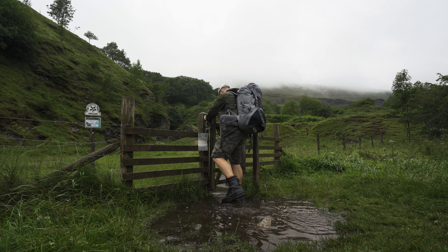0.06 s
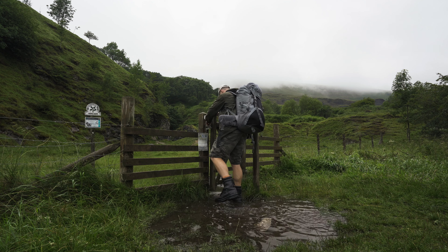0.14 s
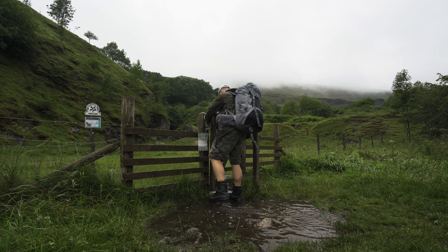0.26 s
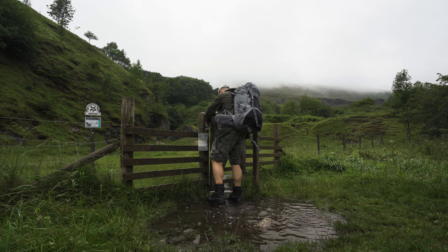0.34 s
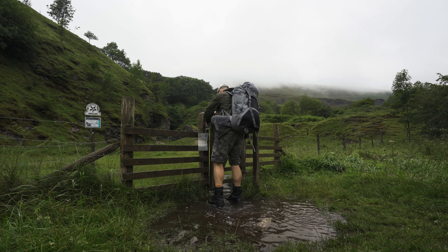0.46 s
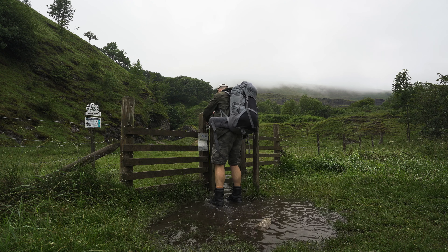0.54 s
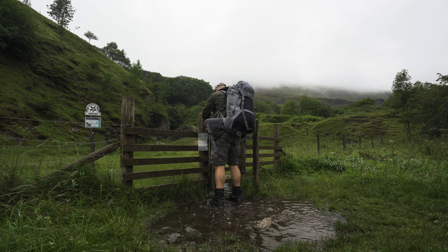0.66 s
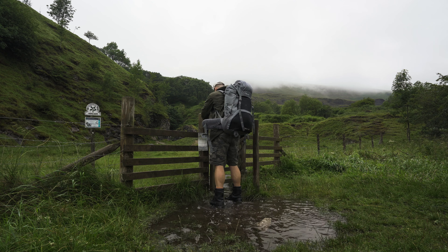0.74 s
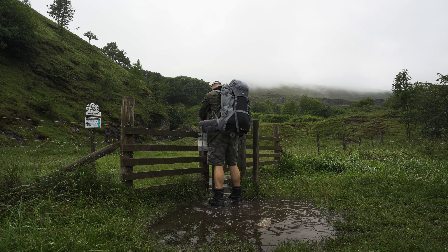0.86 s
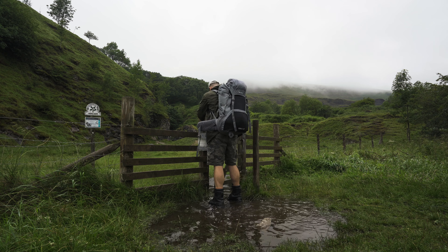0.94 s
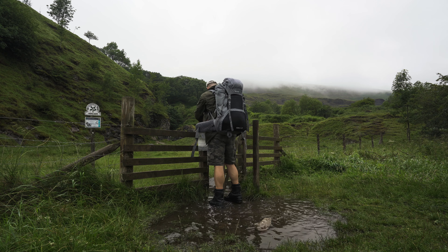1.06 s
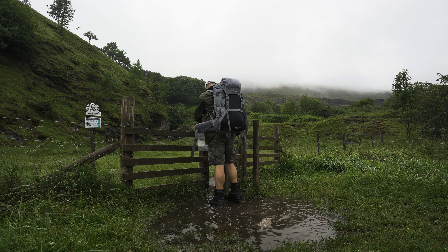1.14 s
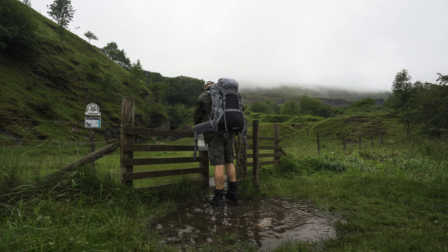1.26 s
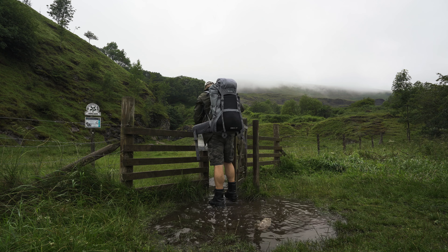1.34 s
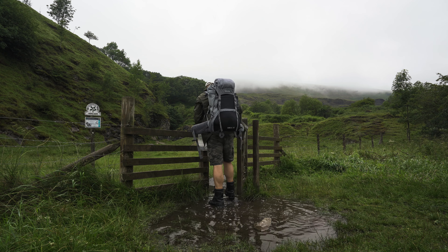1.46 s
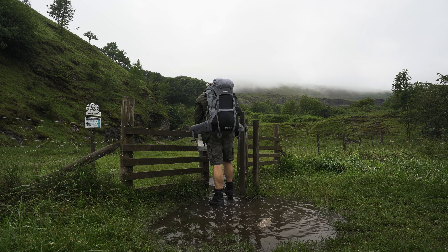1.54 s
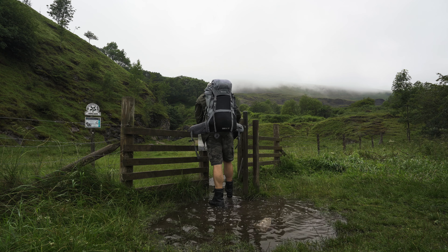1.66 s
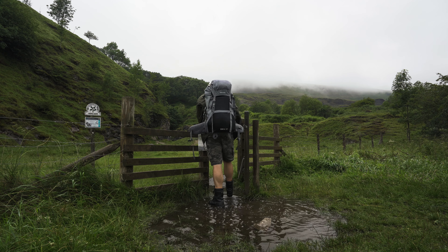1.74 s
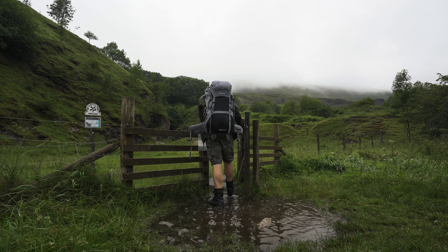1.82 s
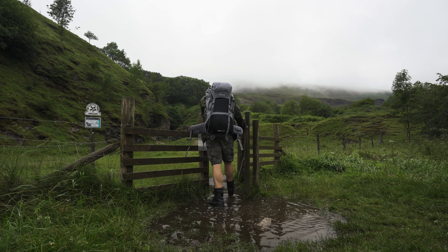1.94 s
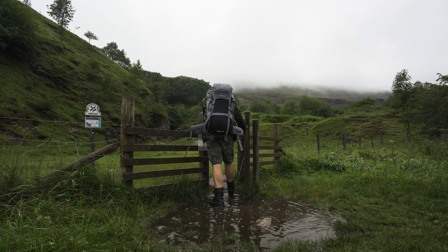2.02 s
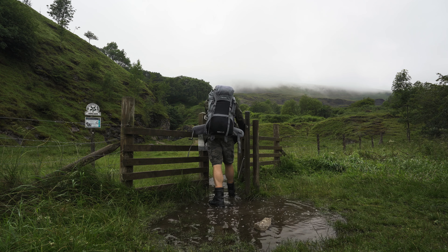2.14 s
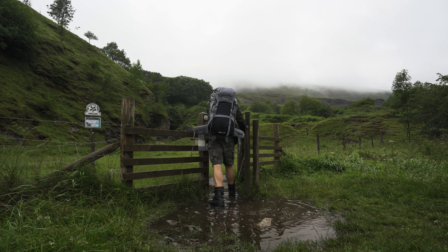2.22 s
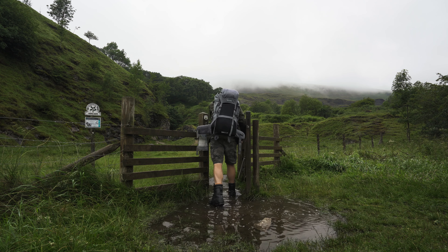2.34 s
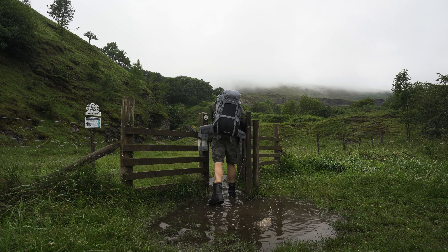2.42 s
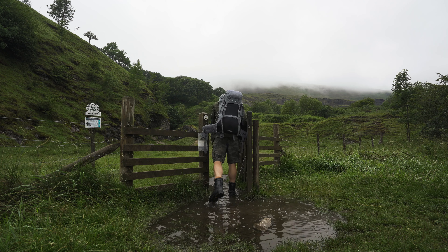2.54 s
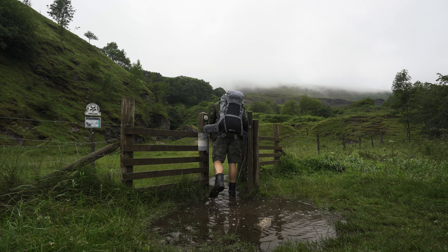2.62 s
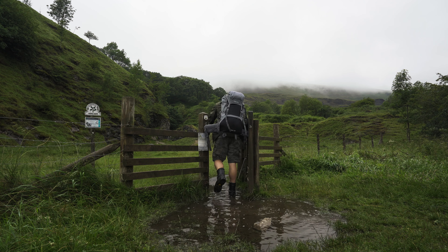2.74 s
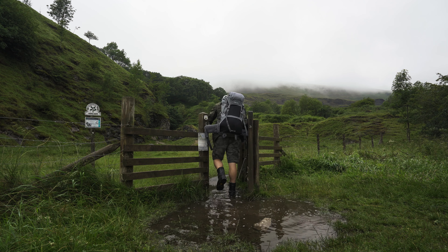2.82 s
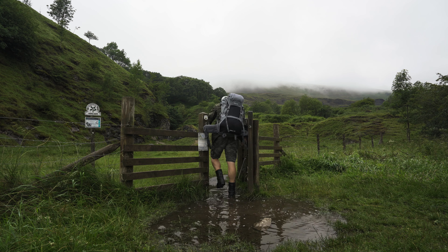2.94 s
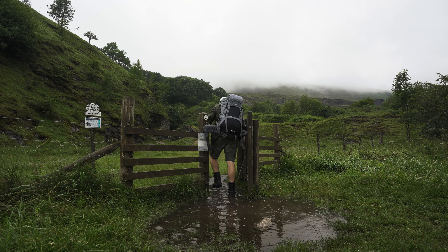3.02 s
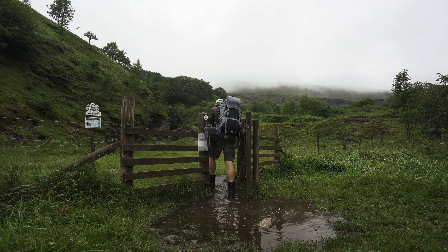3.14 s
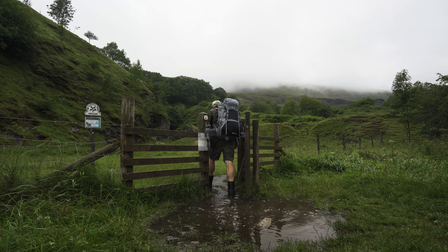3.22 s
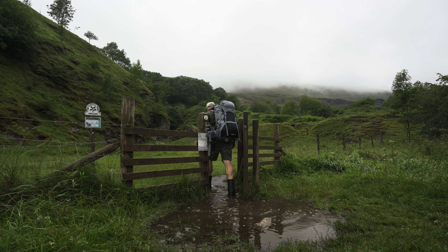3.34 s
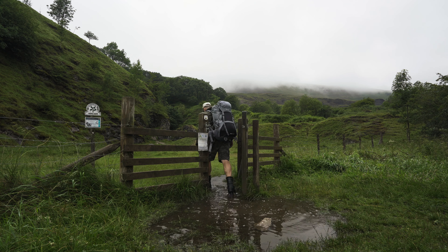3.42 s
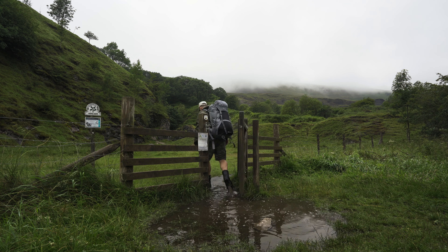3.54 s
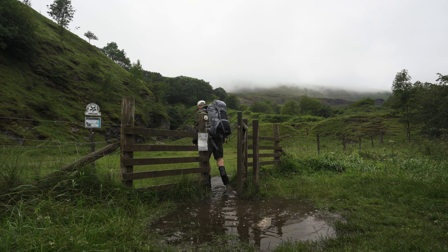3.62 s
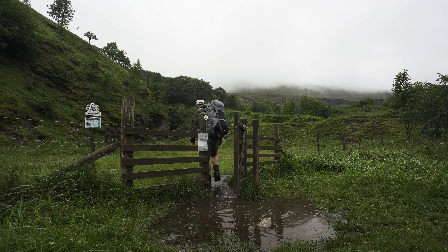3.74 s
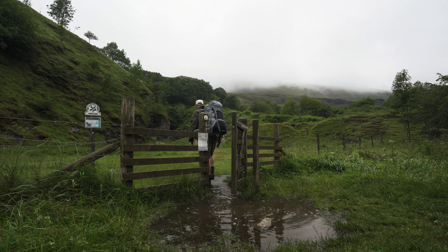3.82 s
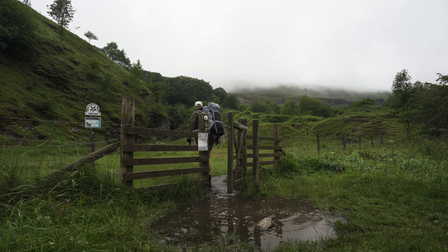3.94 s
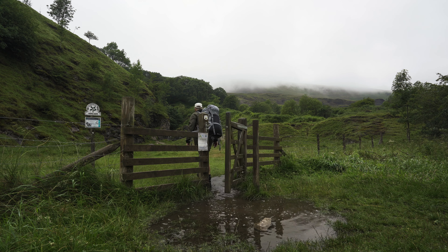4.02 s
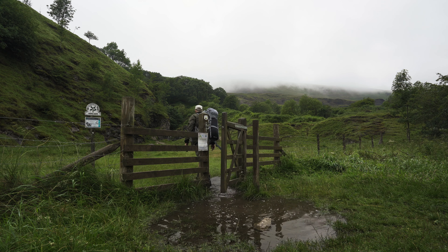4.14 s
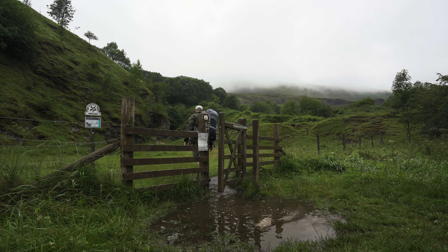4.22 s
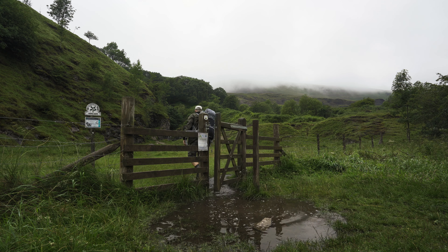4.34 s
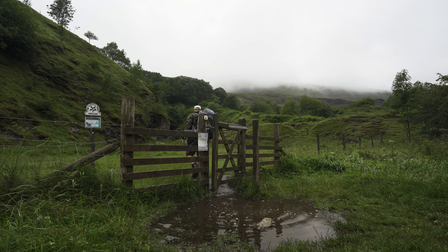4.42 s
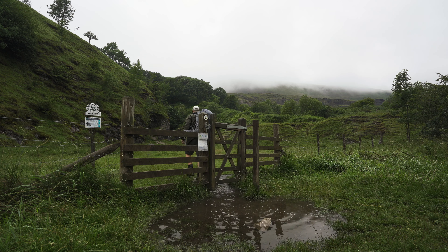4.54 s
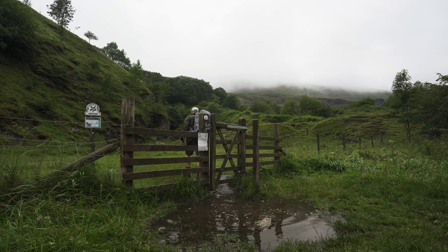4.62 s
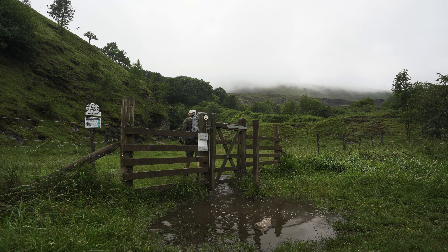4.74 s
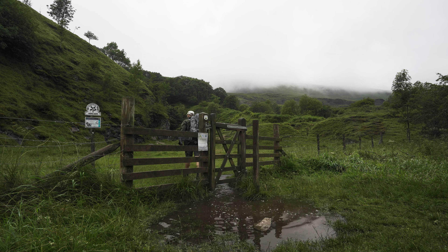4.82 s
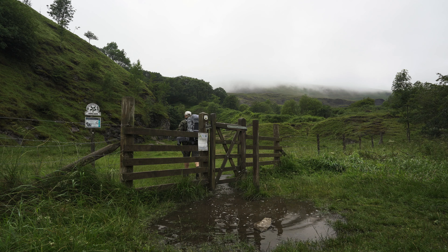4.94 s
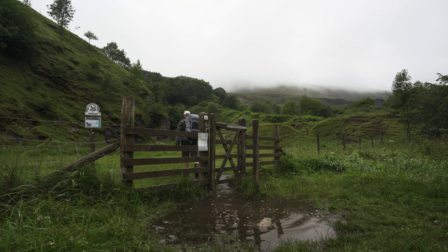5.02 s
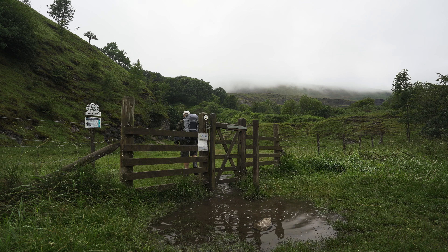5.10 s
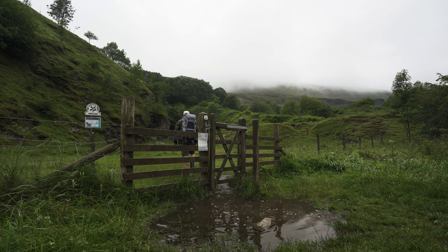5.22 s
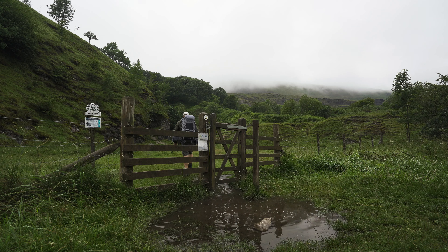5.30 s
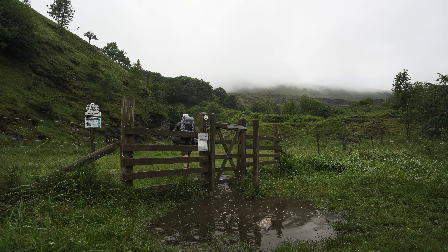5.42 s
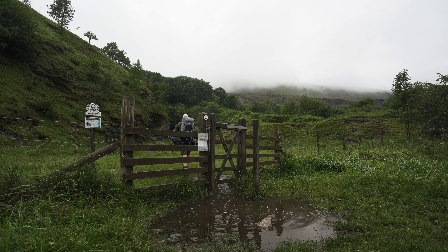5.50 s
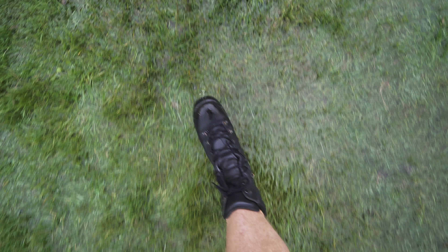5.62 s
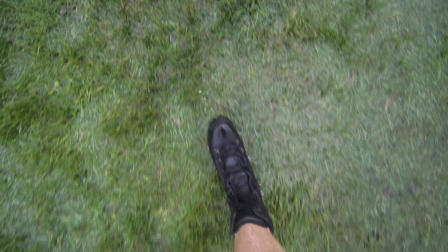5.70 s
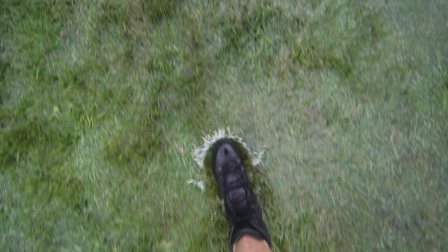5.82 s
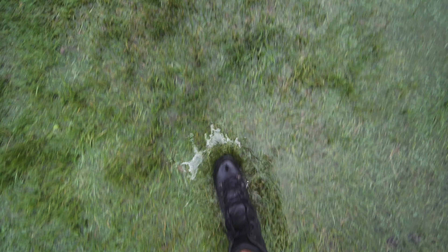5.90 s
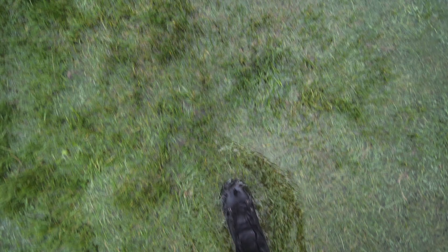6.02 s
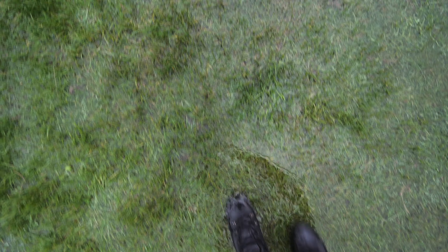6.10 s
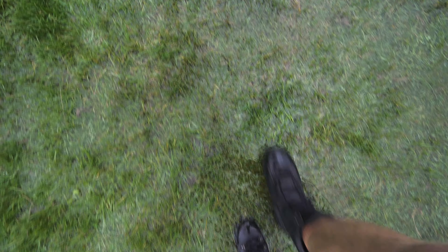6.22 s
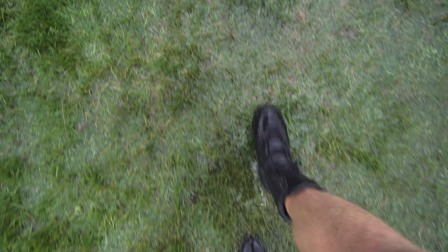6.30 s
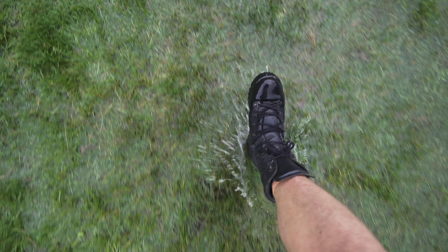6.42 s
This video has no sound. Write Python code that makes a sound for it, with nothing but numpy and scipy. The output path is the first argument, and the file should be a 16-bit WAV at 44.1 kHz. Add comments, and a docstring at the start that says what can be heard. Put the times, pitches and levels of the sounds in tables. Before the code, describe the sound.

A wooden gate clatters open, boots slosh through a puddle, the gate slams and rattles shut, then two close squelching steps.

```python
"""Water stirs and bubbles round a hiker's boots in a puddle, over a faint hiss of drizzle.
A wooden field gate is unlatched, each impact exciting the modes of its rails and steel latch.
The boots wade through, flinging drops and trapping air that resonates as bubbles; small birds call.
The gate slams and rattles shut. Then, heard from close above, two steps squelch into sodden grass
while wind rumbles at the microphone."""
import sys
import numpy as np
from scipy import signal
from scipy.fft import rfft, irfft
from scipy.io import wavfile
from scipy.ndimage import uniform_filter1d

SR = 44100
rng = np.random.default_rng(int(sys.argv[2]) if len(sys.argv) > 2 else 0)


def transcribe(signal):
    """Save signal, clipped to [-1, 1], as a 16-bit WAV file at the path in sys.argv[1]."""
    frames = np.atleast_2d(signal).T
    limited = np.clip(frames, -1, 1)
    pcm = np.round(limited * 32767).astype(np.int16)
    wavfile.write(sys.argv[1], SR, pcm)


N = 284884
TIME = np.arange(N) / SR
RING_TIME = TIME[:SR]  # the second that follows an impact


def undb(db):
    """Decibels to amplitude ratio."""
    return 10 ** (np.asarray(db) / 20)


def unit(x):
    """Normalisation to rms 1."""
    return x / np.sqrt(np.mean(x ** 2))


def burst(x, span=0.0042):
    """Normalisation of a transient to the energy of rms 1 held for span seconds."""
    return x / np.sqrt(np.sum(x ** 2) / (span * SR))


def fade(t60):
    """Exponential free decay, 60 dB in t60 seconds."""
    return np.exp(-np.log(1000) * RING_TIME / t60)


def add(out, s, x):
    """Superposition of x on out, starting at time s."""
    i = int(np.clip(s * SR, 0, N - 1))
    out[i:i + len(x)] += x[:N - i]


def colour(x, spectrum, size=1024):
    """Minimum-phase filter through (frequency [Hz], gain [dB]) points, by folding the cepstrum."""
    hz, db = np.transpose(spectrum)
    bins = np.maximum(np.arange(size // 2 + 1) * SR / size, 1)
    gain = undb(np.interp(np.log(bins), np.log(hz), db))
    cepstrum = irfft(np.log(gain))
    cepstrum[1:size // 2] *= 2
    cepstrum[size // 2 + 1:] = 0
    return signal.fftconvolve(x, irfft(np.exp(rfft(cepstrum))))[:len(x)]


def soften(x, hz, order=2):
    """Low-pass filter with its cutoff at hz."""
    return signal.lfilter(*signal.butter(order, min(hz, SR / 2 - 1), fs=SR), x)


def wander(rate):
    """Smooth random modulation of rms 1, with rate new values a second."""
    hold = int(SR / rate)
    steps = np.repeat(rng.standard_normal(N // hold + 1), hold)[:N]
    return unit(uniform_filter1d(steps, hold))


def patter(rate, spread_db):
    """Shot noise: on average rate impulses a second, of very uneven size."""
    sizes = undb(spread_db * np.minimum(rng.exponential(size=N), 3.5))
    return unit((rng.random(N) < rate / SR) * rng.choice([-1, 1], N) * sizes)


def chirps(table, attack, waver_oct):
    """Frequency modulation: gliding, unsteady sines that swell and die away."""
    out, wobble = np.zeros(N), wander(500)
    for s, hz, db, length, octaves in table:
        age = np.linspace(0, 1, int(length * SR))
        shape = age ** attack * (1 - age) ** 2
        drift = waver_oct * wobble.take(int(s * SR) + np.arange(len(age)), mode="wrap")
        pitch = hz * 2 ** (octaves * age + drift)
        add(out, s, undb(db) * shape / shape.max() * np.sin(2 * np.pi * np.cumsum(pitch) / SR))
    return out


# spectrum of drizzle on the field: (frequency [Hz], relative level [dB])
DRIZZLE_SPECTRUM = [(15, -31), (28, -7.5), (42, 3.5), (70, -5), (130, -4.5), (166, -6), (212, -4),
                    (427, -9.5), (677, -12), (1260, -14), (1610, -26), (2480, -20), (8360, -31.5),
                    (10100, -35.5), (16000, -42.5)]


def drizzle(level_db=-55.5):
    """Incoherent summation: countless small drops merge into an even hiss."""
    drops = .35 * patter(rate=3000, spread_db=2.5) + rng.standard_normal(N)
    hiss = unit(colour(drops, DRIZZLE_SPECTRUM, size=8192))
    return hiss * undb(level_db + .4 * wander(9))


def push(s, rise, decay):
    """Power envelope of displaced water: a bell-shaped rise to time s, then exponential draining."""
    exponent = np.where(TIME < s, ((TIME - s) / rise) ** 2, (TIME - s) / decay)
    return np.exp(-2 * np.minimum(exponent, 20))


# stirred puddle and rustling waterproofs; near 4.83 s, the noisy wash of the slammed gate dying away:
# (time [s], relative low wash [dB], relative high wash [dB])
WASH_LEVELS = [(0.0, -57, -57), (0.19, -46, -60.5), (0.31, -60, -67.5), (1.16, -57, -66), (1.35, -55, -59),
               (1.57, -57, -68), (2.19, -56, -61), (2.38, -51, -60), (2.67, -49, -57), (2.86, -53, -60.5),
               (3.15, -56, -57.5), (3.71, -44, -54.5), (3.93, -62.5, -68.5), (4.64, -55, -64),
               (4.83, -46.5, -53), (5.15, -56.5, -65), (5.33, -61.5, -72.5), (5.65, -56.5, -61.5)]
# boots pushing through the puddle: (peak time [s], decay [s], slosh level [dB], spray level [dB])
PUDDLE_SPLASHES = [(.163, .014, -58, -46), (.541, .011, -31, -30), (.56, .007, -38, -28),
                   (.616, 0.028, -38, -55), (.729, .011, -32, -39.5), (0.747, 0.019, -30.5, -39),
                   (1.42, 0.083, -51.5, -60), (2.327, 0.04, -42, -41), (3.225, 0.013, -37.5, -51),
                   (3.288, 0.038, -42.5, -52), (3.359, .009, -44, -45), (3.497, .024, -38.5, -40.5),
                   (3.651, 0.016, -27, -52), (3.841, 0.071, -48, -47), (4.242, 0.018, -52.5, -45.5),
                   (4.303, 0.019, -37, -42), (4.336, 0.011, -34, -46.5), (4.905, .06, -62, -50),
                   (5.051, 0.025, -40, -44), (5.526, 0.0076, -46, -51.5)]
# soles landing on sodden turf: (time [s], draining time [s], slosh level [dB], spray level [dB])
TURF_STEPS = [(5.839, .08, -25.5, -25.5), (6.381, .028, -25, -28)]


def footwork(turf_from_s=5.71, seep_db=-55.5, turf_rustle_db=-48.5, heel_lead_s=.084, heel_db=-10):
    """Addition of powers: a noisy wash, splashes and steps give the amplitudes of slosh and spray."""
    times, low_db, high_db = np.transpose(WASH_LEVELS)
    on_turf = TIME > turf_from_s  # close by, grass seeps and waterproofs rustle steadily
    slosh_power = undb(np.where(on_turf, seep_db, np.interp(TIME, times, low_db) - 1.5)) ** 2
    spray_power = undb(np.where(on_turf, turf_rustle_db, np.interp(TIME, times, high_db) + 2)) ** 2
    for s, decay, slosh_db, spray_db in PUDDLE_SPLASHES:
        splash = push(s, rise=.7 * decay, decay=decay)
        slosh_power += undb(slosh_db) ** 2 * splash
        spray_power += undb(spray_db) ** 2 * splash
    for s, drain, slosh_db, spray_db in TURF_STEPS:
        heel = undb(heel_db) ** 2 * push(s - heel_lead_s, rise=.015, decay=.029)
        sole = push(s, rise=.017, decay=drain)
        slosh_power += undb(slosh_db) ** 2 * (heel + sole)
        spray_power += undb(spray_db) ** 2 * (heel + sole)
    return np.sqrt(slosh_power), np.sqrt(spray_power)


def fizz(lo_hz, hi_hz, rate, cycles, spread_db, count=16):
    """Bubble resonance in a swarm: each rings at the pitch of its size, rising as it surfaces."""
    out = 0
    for hz in np.geomspace(lo_hz, hi_hz, count):
        age = np.linspace(0, 1, int(cycles / hz * SR))
        bubble = age * np.exp(-8 * age) * np.sin(2 * np.pi * cycles * age * (1 + age / 5))
        swarm = patter(rate * np.sqrt(hz / lo_hz), spread_db)  # small bubbles outnumber large ones
        out = out + np.sqrt(hz) * unit(signal.oaconvolve(swarm, bubble)[:N])
    return unit(out)


# spectra of slosh, of spray and of flung drops landing: (frequency [Hz], relative level [dB])
SLOSH_SPECTRUM = [(100, -14.5), (400, -3.5), (750, -3.5), (1300, 0.5), (2100, -3), (3200, -18), (6000, -20),
                  (16000, -21)]
SPRAY_SPECTRUM = [(200, 5.5), (1200, -11.5), (2500, 4.5), (4200, 4.5), (6300, -2), (8400, 5), (10300, -13),
                  (13000, -4), (16000, -19)]
CRACKLE_SPECTRUM = [(300, -45), (1200, -2), (2800, -1), (8400, -5), (10300, -13.5), (16000, -11.5)]


def boots(slosh, spray, breakup_db=-47, clump_db=2.8, clumps_per_s=160, crackle_db=-5):
    """Break-up of displaced water: bubbly slosh and spray come in clumps, and flung drops crackle."""
    water = fizz(500, 4500, rate=55, cycles=14, spread_db=3.8) + .5 * rng.standard_normal(N)
    water = unit(colour(water, SLOSH_SPECTRUM))
    droplets = fizz(1800, 14000, rate=70, cycles=18, spread_db=4) + .9 * rng.standard_normal(N)
    droplets = unit(colour(droplets, SPRAY_SPECTRUM))
    crackle = undb(crackle_db) * unit(colour(patter(rate=190, spread_db=3.4), CRACKLE_SPECTRUM))
    # calm water stays smooth; only a strong splash flies apart
    breakup = spray ** 2 / (spray ** 2 + undb(breakup_db) ** 2)
    clumps = undb(clump_db * breakup * wander(clumps_per_s))
    return clumps * (slosh * water + spray * (droplets + breakup * crackle))


# large air pockets closing under water:
# (time [s], starting pitch [Hz], level [dB], duration [s], glide [octaves])
AIR_POCKETS = [(.018, 2340, -45, 0.04, 0.63), (.13, 1510, -37.5, 0.021, .3), (.698, 850, -34, 0.089, 0.84),
               (1.21, 775, -46.5, 0.046, 0.18), (1.27, 1287, -38.5, 0.022, 0.25),
               (1.288, 1650, -43.5, 0.029, -0.088), (1.478, 2070, -39, 0.012, 0.18),
               (2.196, 1890, -43, 0.033, 1), (2.311, 1147, -25, 0.016, 0.47),
               (2.687, 692, -25, 0.014, 0.78), (2.692, 910, -22, 0.023, 1), (2.80, 210, -32, 0.04, -0.21),
               (2.85, 1630, -39, 0.039, 0.98), (3.272, 760, -36, 0.058, .14),
               (3.466, 1610, -28.5, 0.013, -0.47), (3.602, 1300, -30, 0.011, 0.23),
               (3.648, 1152, -19.5, 0.019, 0.14), (3.835, 1590, -34, 0.022, 0.17),
               (4.423, 905, -34.5, 0.012, -0.069), (5.836, 340, -22.5, 0.0091, 0.53),
               (6.0, 2250, -26.5, 0.015, 0.067)]


def gurgles(slosh, count=130, centre_hz=1900, cycles=24, calm_slosh_db=-52, calm_bubble_db=-45.5):
    """Resonance of trapped air: large pockets, and random small bubbles that follow the slosh level."""
    small = []
    for k, (size, strength, glide, delay) in enumerate(rng.standard_normal((count, 4))):
        i = int((k + delay) * N / count) % N
        hz = centre_hz * 2 ** (.55 * np.clip(size, -2, 2))
        above_calm_db = 20 * np.log10(slosh[i]) - calm_slosh_db
        typical_db = min(calm_bubble_db + 1.6 * above_calm_db, -40.5)  # louder with slosh, up to a cap
        octaves = .25 * (1 + 2 * glide)
        small.append((i / SR, hz, typical_db + min(strength, 2), cycles / hz, octaves))
    return chirps(AIR_POCKETS, attack=.6, waver_oct=.11) + chirps(small, attack=.6, waver_oct=.11)


def ring(modes):
    """Modal superposition: each strike point gives the modes new strengths, signs and slight detuning."""
    out = 0
    for hz, db, t60 in modes:
        scatter_db, detune, sign = rng.standard_normal(3) * (3, .003, 1)
        tone = np.sin(2 * np.pi * hz * (1 + detune) * RING_TIME)
        out = out + np.sign(sign) * undb(db + scatter_db) * fade(t60) * tone
    return burst(out)


# blows on the gate: (time [s], knock level [dB], contact cutoff [Hz], latch level [dB])
GATE_BLOWS = [(0.193, -24.5, 4040, -33), (0.2201, -31, 2600, -70), (0.2409, -22.5, 3000, -15),
              (.258, -15, 13000, -36), (0.2613, -12.5, 15000, -33), (0.333, -34.5, 3860, -58),
              (.6415, -10.5, 4700, -38), (0.668, -38, 7000, -46), (4.633, -21.5, 1700, -50),
              (4.6442, -9, 13600, -41), (4.658, -19.5, 3200, -37), (4.6672, -13.5, 3750, -47),
              (4.684, -25.5, 9000, -38), (4.696, -13, 2000, -32), (4.7153, -9.5, 13100, -14.5),
              (4.726, -13, 3300, -46), (4.752, -16, 4200, -20), (4.7614, -8.5, 8300, -22),
              (4.7778, -14, 3410, -44), (4.7977, -21.5, 8850, -46), (4.843, -14.5, 2000, -50),
              (4.857, -33, 3500, -39), (4.8885, -22.5, 1550, -43)]
# spectrum of a knock on timber: (frequency [Hz], relative level [dB])
KNOCK_SPECTRUM = [(80, -24.5), (350, -11.5), (650, 3.5), (1000, -3.5), (1400, 1.5), (2000, 6), (2900, -0.5),
                  (5000, -8), (8500, -7.5), (10300, -26.5), (13000, -7), (16000, -15)]
# modes of the rails and of the steel latch: (frequency [Hz], relative level [dB], t60 [s])
RAIL_MODES = [(501, -22.5, 0.3), (702, -15.5, 0.09), (759, -4.5, 0.082), (1012, -9.5, 0.1),
              (1178, -10.5, 0.075), (1324, 5.5, 0.059), (1421, -3, 0.06), (1730, 5, 0.026),
              (1915, 5, 0.044), (2110, 3, 0.027), (2520, -2, 0.036), (3193, -7, 0.054)]
LATCH_MODES = [(4060, -2, .04), (5230, -13, .05), (7170, -4.5, 0.05), (8380, 2, 0.05), (8650, -1.5, 0.045),
               (12260, -15, 0.035), (13450, -18, .03)]


def gate(rise_s=.00047, rebound_s=.004, rebound_db=-13):
    """Impact excitation: each blow cracks on the timber, rings rails and latch, and rebounds once."""
    out = np.zeros(N)
    press = 1 - np.exp(-RING_TIME / rise_s)
    envelope = press * (fade(.022) + undb(-30) * fade(.13))  # a short crack and a faint tail
    for s, knock_db, cutoff_hz, latch_db in GATE_BLOWS:
        contacts = rng.standard_normal((2, len(RING_TIME))) * envelope
        # a softer contact pushes for longer and loses its treble
        crack, rebound = (burst(soften(colour(hit, KNOCK_SPECTRUM), cutoff_hz)) for hit in contacts)
        rails = undb(.5) * press * ring(RAIL_MODES)
        latch = press * ring(LATCH_MODES)
        add(out, s, undb(knock_db) * (crack + rails) + undb(latch_db) * latch)
        add(out, s + rebound_s, undb(knock_db + rebound_db) * rebound)
    return out


def thud(hz, t60):
    """Damped oscillation: one heave, with a dull noisy shudder of equal energy."""
    heave = burst(-np.sin(2 * np.pi * hz * RING_TIME) * fade(t60))
    spectrum = [(hz / 4, -22), (hz, -2), (hz * 2, 0), (hz * 12, -42), (SR / 2, -85)]
    shudder = colour(rng.standard_normal(len(RING_TIME)) * fade(t60), spectrum, size=4096)
    return burst(heave + burst(shudder))


# the gate's whole weight landing on its post: (time [s], level [dB])
HEAVY_BLOWS = [(.261, -25), (0.644, -26), (4.6327, -9), (4.644, -12)]
# low ground shudder and boom of the frame after a heavy gate blow:
# (frequency [Hz], relative level [dB], t60 [s])
BOOM_MODES = [(39.7, -15, 1.3), (134.6, -11.5, .5), (241, -3.5, 0.13), (319, -2, 0.063)]
# gate against its stop, boots on firm ground: (time [s], level [dB], pitch [Hz], t60 [s])
DULL_CONTACTS = [(.2605, -21, 677, 0.099), (0.6428, -11, 687, 0.047), (2.537, -34, 328, 0.083),
                 (4.174, -28.5, 198, 0.033), (4.777, -20.5, 242, 0.075), (5.216, -35.5, 70.3, 0.12)]


def thuds():
    """Free vibration: after a heavy blow the ground shudders and the frame booms; gate and boots thump."""
    out = np.zeros(N)
    for s, db in HEAVY_BLOWS:
        add(out, s, sum(undb(db + mode_db) * thud(hz, t60) for hz, mode_db, t60 in BOOM_MODES))
    for s, db, hz, t60 in DULL_CONTACTS:
        add(out, s, undb(db) * thud(hz, t60))
    return out


# the loudest drops and wet snaps: (time [s], level [dB], pitch [Hz])
WET_SNAPS = [(.5485, -24, 6000), (.5562, -18, 6500), (.709, -28, 1100), (.747, -24, 4000),
             (1.143, -37, 1700), (1.158, -38, 4300), (2.441, -30, 2300), (2.687, -32, 3600),
             (2.778, -36, 2100), (3.633, -31, 1500), (3.852, -30, 7000), (4.329, -27, 2300),
             (4.338, -25, 1500), (5.72, -31, 3000), (5.8145, -21, 3500), (5.835, -14, 3500),
             (5.843, -15, 1100), (5.850, -14, 3500), (5.86, -14, 1700), (5.8845, -20, 2000),
             (5.9265, -16, 2200), (5.976, -24, 2800), (6.046, -24, 2800), (6.13, -31, 5000),
             (6.357, -23, 6000), (6.378, -20, 2200)]


def snaps(cycles=6, spatter_t60=.008):
    """Heavily damped transients: drops land and mud films burst, each a pop with a band of spatter."""
    out = np.zeros(N)
    for s, db, hz in WET_SNAPS:
        onset = 1 - np.exp(-hz * RING_TIME)
        pop = burst(onset * np.sin(2 * np.pi * hz * RING_TIME) * fade(cycles / hz))
        band = signal.butter(2, [hz / 2, hz * 1.4], "bandpass", fs=SR)
        spatter = burst(signal.lfilter(*band, rng.standard_normal(len(RING_TIME)) * fade(spatter_t60)))
        add(out, s, undb(db) * burst(pop + .9 * spatter, span=.001))
    return out


# water squirting from under the boot: (time [s], level [dB])
BOOT_SQUIRTS = [(.642, -32), (5.741, -29), (5.925, -26)]


def squirts(start_hz=2000, glide_oct=-1.7, length_s=.048, half_width_hz=380):
    """Cavity resonance: froth excites a pocket in the mud, whose pitch falls as it opens."""
    out, age = np.zeros(N), np.linspace(0, 1, int(length_s * SR))
    phase = 2 * np.pi * np.cumsum(start_hz * 2 ** (glide_oct * age)) / SR
    shape = (1 - np.exp(-20 * age)) * (1 - age)
    for s, db in BOOT_SQUIRTS:
        froth = rng.standard_normal((2, len(RING_TIME)))
        in_phase, quadrature = (unit(soften(noise, half_width_hz)[:len(age)]) for noise in froth)
        add(out, s, undb(db) * shape * (in_phase * np.cos(phase) + quadrature * np.sin(phase)))
    return out


# far birds: (time [s], starting pitch [Hz], level [dB], duration [s], glide [octaves])
BIRD_CALLS = [(.9, 4300, -64, 0.089, 0.12), (4.97, 4670, -55, 0.046, 0.086), (5.095, 4480, -53, .04, 0.098),
              (5.235, 5800, -57, 0.15, -0.19)]


def birds():
    """Nearly pure tones: small birds give short, gliding whistles."""
    return chirps(BIRD_CALLS, attack=1.5, waver_oct=.012)


# spectrum of wind on the microphone: (frequency [Hz], relative level [dB])
WIND_SPECTRUM = [(9, -3), (20, -18), (42, -18), (70, -34), (150, -30.5), (400, -44), (2000, -64)]
# strength of the gusts: (time [s], level [dB])
GUST_LEVELS = [(0, -81), (5.66, -58.5), (5.75, -32.5), (5.9, -37), (5.99, -24.5), (6.1, -34.5),
               (6.46, -39.5)]


def wind():
    """Turbulent pressure fluctuation: gusts rumble at the microphone."""
    rumble = unit(colour(rng.standard_normal(N), WIND_SPECTRUM, size=16384))
    return rumble * undb(np.interp(TIME, *np.transpose(GUST_LEVELS)))


def field(x, t60=.2, wet_db=-26, dull_hz=3500):
    """Scattering: fence and hillside add a faint, dull tail."""
    tail = soften(rng.standard_normal(len(RING_TIME)) * fade(t60), dull_hz, order=1)
    return x + undb(wet_db) * signal.fftconvolve(x, tail / np.linalg.norm(tail))[:N]


def scene():
    """Superposition in one channel: water, gate and birds in the open, under drizzle and wind."""
    slosh, spray = footwork()
    water = boots(slosh, spray) + gurgles(slosh) + squirts() + snaps()
    sources = water + birds() + gate() + thuds()
    return (field(sources) + drizzle() + wind())[None]


def record(dry, ceiling=.95, top_hz=15900):
    """Clipping and band limiting: the hardest blows overload, and a steep low-pass cuts the top."""
    clipped = np.clip(dry, -ceiling, ceiling)
    return signal.sosfilt(signal.ellip(8, .2, 70, top_hz, fs=SR, output="sos"), clipped)


dry = scene()
out = record(dry)
transcribe(out)
```